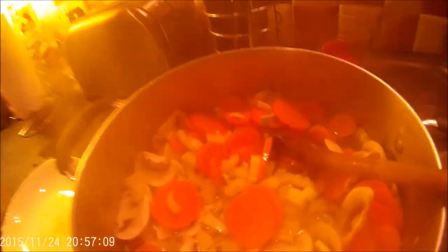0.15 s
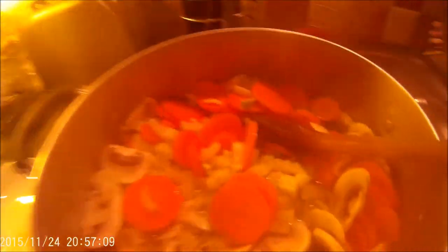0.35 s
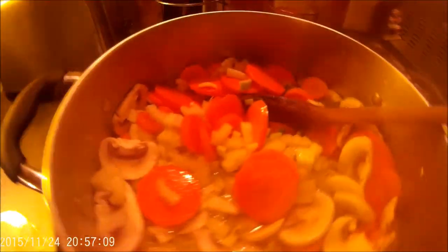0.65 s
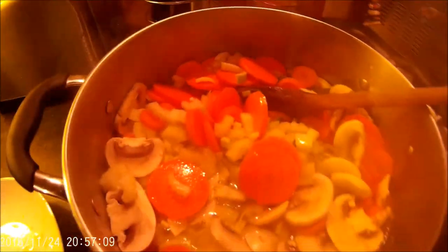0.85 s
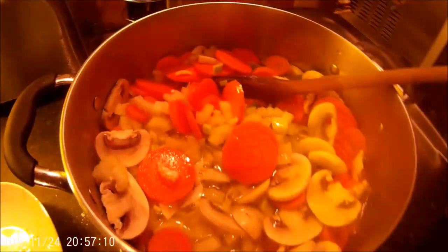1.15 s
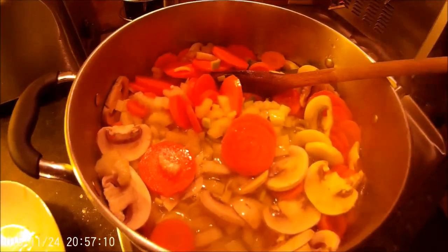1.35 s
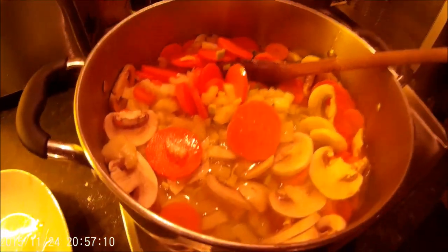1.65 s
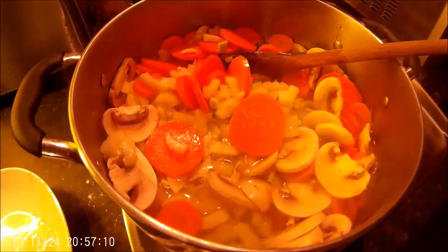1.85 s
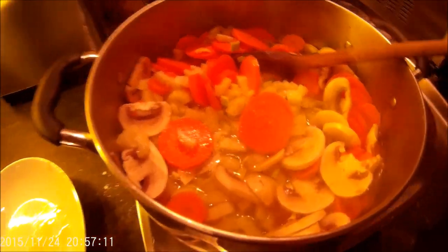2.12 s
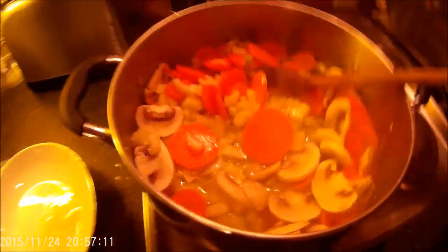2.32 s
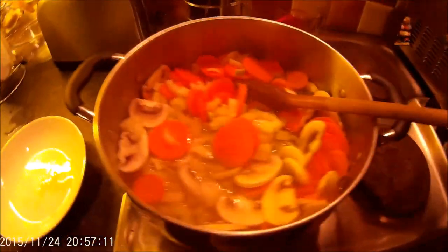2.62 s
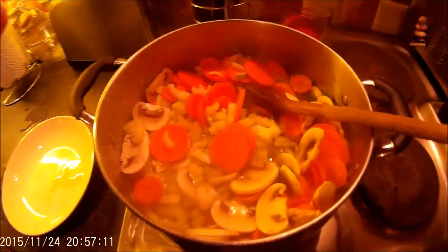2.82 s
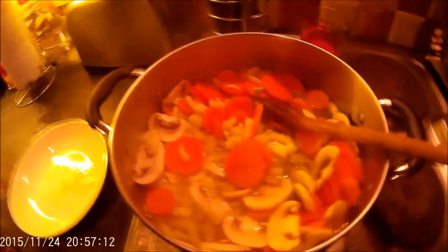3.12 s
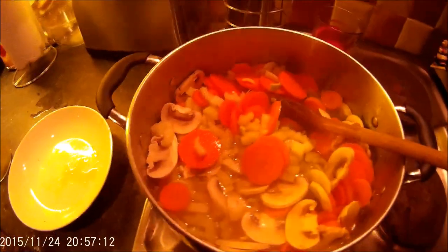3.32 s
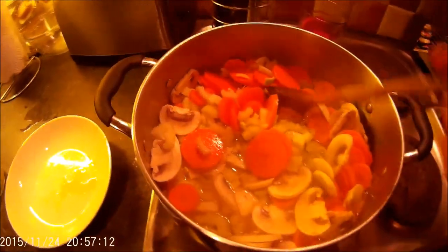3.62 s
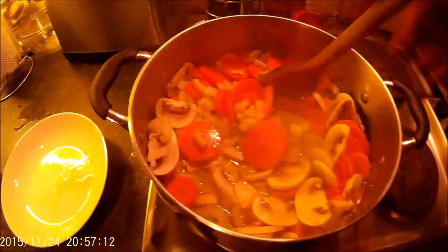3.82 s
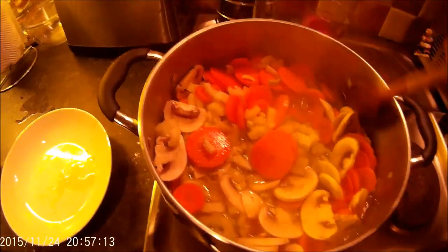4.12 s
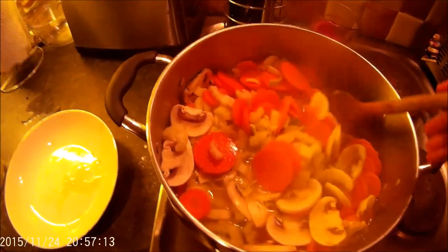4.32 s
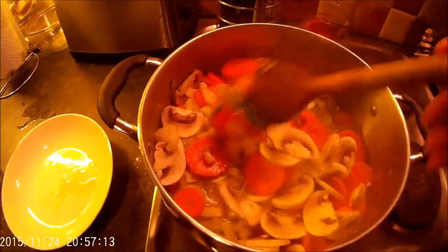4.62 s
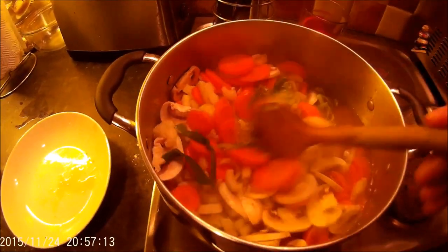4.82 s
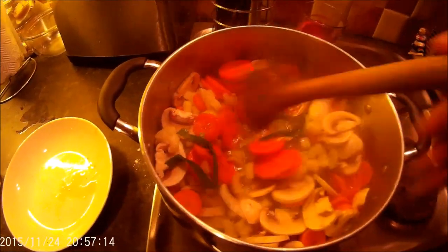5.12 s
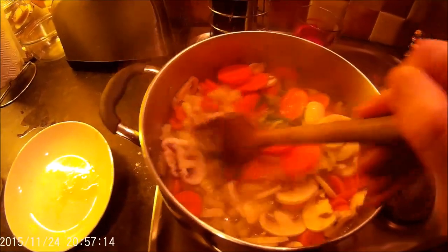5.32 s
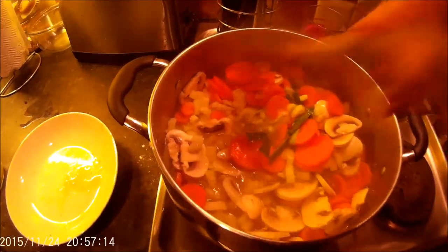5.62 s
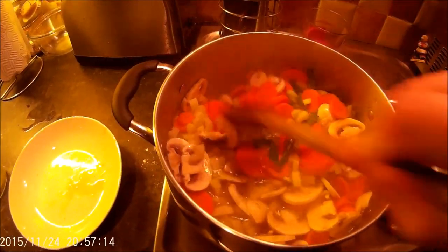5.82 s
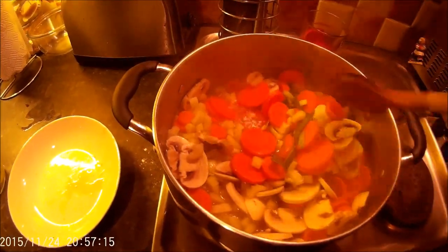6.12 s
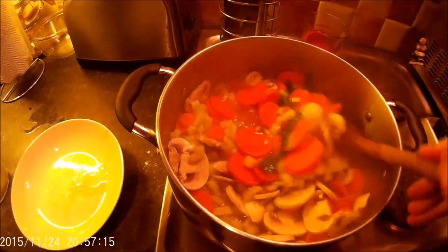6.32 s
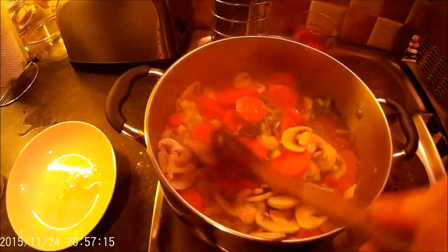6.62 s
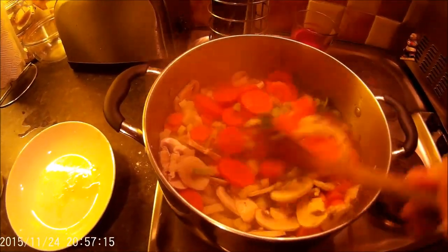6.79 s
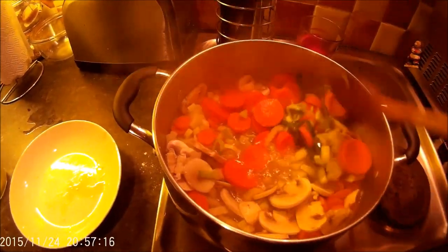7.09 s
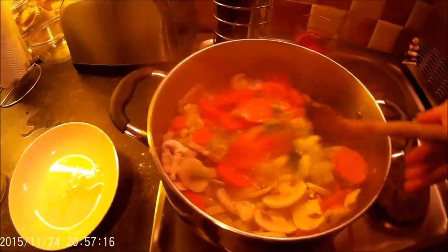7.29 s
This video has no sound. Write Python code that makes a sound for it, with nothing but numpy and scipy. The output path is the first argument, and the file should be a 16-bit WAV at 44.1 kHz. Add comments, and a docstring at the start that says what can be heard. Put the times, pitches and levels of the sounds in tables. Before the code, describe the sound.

A drawer thuds shut over a soft stove burner, then a wooden spoon knocks and stirs wet vegetables in a steel pot.

```python
"""A lit stove's burner rushes softly over a mains hum in a small tiled kitchen. Nearby a drawer rattles
along its runners and thuds shut, then a plastic camera case creaks and snaps in the hand.
From about four seconds a wooden spoon stirs vegetable stew in a steel pot. It knocks on the full,
well damped pot, which rings only briefly, and pushes softly through the vegetables while wet pockets
crackle and squelch between the pieces."""
import sys
import numpy as np
from scipy import signal
from scipy.fft import rfft, irfft, next_fast_len
from scipy.io import wavfile

SR = 44100
rng = np.random.default_rng(int(sys.argv[2]) if len(sys.argv) > 2 else 0)


def waveform_to_disk(signal):
    """Save audio, clipped to [-1, 1], as 16-bit WAV at the path in sys.argv[1]."""
    frames = np.transpose(np.atleast_2d(signal))
    scaled = np.clip(frames, -1, 1) * 32767
    samples = np.round(scaled).astype(np.int16)
    wavfile.write(sys.argv[1], SR, samples)


N = 328721
TIME = np.arange(N) / SR
AGE = TIME[:SR]   # the second that follows a hit

# Tone of the burner and room. Each row: frequency in Hz, relative noise density in dB.
BURNER_TONE = [(20, -7), (40, 0), (62, 5), (80, -6), (130, -4.5), (300, -4), (600, -6.5), (820, -14.5),
               (1100, -15), (1500, -23), (2200, -28), (4000, -37.5), (15000, -79)]
# Partials of the mains hum. Each row: frequency in Hz, level in dB.
HUM_PARTIALS = [(99.7, -63), (197.5, -72.5), (298, -70.5)]

# The drawer's bumps; the last is its stop. Each row: start in seconds, level in dB, boom level in dB.
DRAWER_BUMPS = [(1.235, -33.5, -39), (1.309, -40, -63), (1.342, -45, -48), (1.4303, -26, -24)]
# Tones of the runners and the wooden front. Each row: frequency in Hz, relative noise density in dB.
RUNNER_TONE = [(40, -31), (70, 11.5), (150, -10), (300, -7.5), (500, 5), (800, -12), (1250, -4.5),
               (2100, -17), (2650, -20), (3100, -34), (3800, -39), (5500, -69), (12000, -72)]
FRONT_TONE = [(80, -4), (170, -2), (300, 6.5), (480, 1.5), (760, -5), (920, -3.5), (1350, -6),
              (1800, -14.5), (2300, -21), (2680, -14.5), (3000, -25), (3800, -29), (5200, -46),
              (6300, -38.5), (7500, -48), (12000, -50)]
# Boom of cabinet and room. Each row: frequency in Hz, relative level in dB, t60 in seconds.
BOOM_MODES = [(65.5, -10, 0.67), (113.7, -1, 0.386), (216, -8, 0.28), (285, -6, 0.25), (357, -12, 0.19),
              (438, -12, 0.16), (614, -13, 0.28), (856, -10, .16), (939, -9, .16)]

# Creaks of the case. Each row: peak time in seconds, level in dB, starting pitch in Hz, rise and fall
# in seconds, seconds from the peak until it sticks again, relative rasp level in dB.
CASE_CREAKS = [(2.438, -57, 1559, 0.001, 0.013, .04, 1), (2.946, -54, 1600, 0.003, 0.02, .015, -3),
               (3.130, -35.5, 770, 0.006, 0.011, .018, -14)]
# Snaps as the grip lets go. Each row: start in seconds, level in dB, pitch in Hz.
CASE_SNAPS = [(2.9526, -32, 1670), (3.1272, -35, 1150)]

# Spoon hits on the pot. Each row: start in seconds, level in dB, hardness as a low-pass cutoff in Hz,
# depth from 0 (wall) to 1 (bottom), ring time multiplier, seconds until the blade lands (0 for never).
SPOON_KNOCKS = [(4.0281, -32, 6000, 0.071, 1, 0), (4.0365, -45, 2500, 0.22, .7, 0.0035),
                (4.0585, -42, 3500, 0.55, 1, 0.0029), (4.2787, -52, 1800, 0.8, .45, 0),
                (4.4160, -47.5, 1700, 0.75, .35, 0), (6.1814, -32, 5008, 0.58, .65, .003),
                (6.243, -49.5, 1190, 0.93, 1, 0.0006), (6.261, -48, 400, 1, .8, 0),
                (6.516, -58, 8000, .9, .4, 0), (6.5615, -58.5, 900, 1, .5, 0),
                (6.642, -62, 2000, 0.25, .5, 0), (6.789, -61, 4000, 1, .4, 0),
                (7.1215, -46.5, 1800, 0.15, .9, 0), (7.138, -50.5, 1100, .3, 1, 0)]
# Modes of the full pot. Each row: frequency in Hz, relative level in dB for a wall hit, the same for
# a hit near the bottom, t60 in seconds.
POT_MODES = [(298, -10, -6, 0.05), (352, -11, 2, 0.085), (482, -3, -8, 0.06), (560, -8, -7, 0.05),
             (645, -10, -8, .035), (785, -5, 5, 0.04), (925, -14, 5, 0.03), (1088, 5, -3, 0.042),
             (1218, 1, 5, 0.036), (1425, -3, -4, 0.022), (1565, -13, 3, 0.05), (1984, -26, -11, 0.035),
             (2290, -22, -10, 0.025), (3750, -14, -34, .02), (4130, -6, -50, 0.022)]
# Tone of the spoon's dry wooden clack. Each row: frequency in Hz, relative noise density in dB.
CLACK_TONE = [(80, 5), (170, -2.5), (330, 1), (450, 5.5), (750, 1.5), (1500, 3), (1750, -24), (2400, -23),
              (3000, -25.5), (4000, -30), (5200, -33), (7000, -40), (12000, -65)]
# Early reflections off tiles and cupboards. Each row: delay in seconds, gain in dB.
TILE_ECHOES = [(.0027, -14), (.0065, -10.5)]

# Pushes through the stew. Each row: fastest moment in seconds, length in seconds, drag level in dB,
# crackle level in dB.
SPOON_PUSHES = [(4.21, 0.62, -59.5, -71), (4.53, 0.31, -62, -70.5), (4.768, 0.67, -61.5, -71.5),
                (5.23, 0.18, -60, -72), (5.355, 0.17, -63, -62.5), (5.704, 0.14, -60.5, -67.5),
                (5.862, 0.099, -56, -69), (5.925, 0.19, -64, -68), (6.303, 0.32, -56.5, -67.5),
                (6.624, 0.2, -59, -78), (6.803, 0.096, -55.5, -66.5), (7.148, 0.12, -53.5, -62.5)]
# Tones of the stew's drag, crackle and spatter. Each row: frequency in Hz, relative noise density in dB.
DRAG_TONE = [(100, 1.5), (250, 10), (350, 8.5), (600, 6.5), (850, -6), (1250, -21), (1700, -29),
             (3000, -53), (8000, -43)]
CRACKLE_TONE = [(900, -9), (1400, -3), (1850, 0), (2100, -10), (2450, -4), (3000, -6), (4000, 2), (5000, 1)]
SPATTER_TONE = [(250, -16), (600, 6), (1100, 4), (1800, -12.5), (2500, 2), (3000, -25), (4500, -11),
                (8000, -34)]
# The standout squelches. Each row: start in seconds, level in dB, starting bubble pitch in Hz.
STEW_SQUELCHES = [(4.2428, -66, 1540), (4.3875, -61.5, 2360), (4.4528, -66, 2200), (4.5561, -66, 2520),
                  (4.7137, -73, 2000), (4.8374, -63, 1810), (4.937, -58, 468), (5.2495, -63.5, 1650),
                  (5.2969, -61, 1760), (5.3315, -56.5, 1810), (5.3563, -60, 1870), (5.668, -65, 1760),
                  (5.7264, -64, 1780), (5.8556, -63, 1860), (5.868, -57.5, 1500), (5.8965, -60.5, 1950),
                  (6.2425, -56, 2250), (6.8184, -63.5, 1870), (6.823, -53, 623)]

# Decay of the kitchen reverb. Each row: frequency in Hz, t60 in seconds.
REVERB_T60 = [(150, 0.63), (400, 0.39), (1000, 0.49), (2000, 0.27), (4000, 0.33)]
# Colour of the reverb under the hood. Each row: frequency in Hz, relative gain in dB.
HOOD_TONE = [(200, -1.5), (340, 3.5), (430, -3.5), (650, 1), (830, -1), (1100, -5), (1400, -5.5),
             (2200, 1.5), (4000, 0)]


def from_db(db):
    """Decibels to gain."""
    return 10 ** (np.asarray(db) / 20)


def unit_rms(x, size=None):
    """Scale to rms 1, judged on the first samples if a size is given."""
    return x / np.sqrt(np.mean(x[:size] ** 2) + 1e-20)


def at_hz(points, hz):
    """Read a table on a log-frequency axis."""
    freqs, values = np.transpose(points)
    return np.interp(np.log(np.maximum(hz, 1)), np.log(freqs), values)


def colour(x, tone):
    """EQ a sound with a tone table; rms 1."""
    size = next_fast_len(len(x))
    gains = from_db(at_hz(tone, np.fft.rfftfreq(size, 1 / SR)))
    return unit_rms(irfft(rfft(x, size) * gains, size)[:len(x)])


def butter(x, hz, kind, order=2):
    """A causal low-, high- or band-pass."""
    return signal.sosfilt(signal.butter(order, np.clip(hz, 10, .45 * SR), kind, fs=SR, output="sos"), x)


def resonate(x, hz, width_hz):
    """One resonance with gain 1 at its peak."""
    r = np.exp(-np.pi * width_hz / SR)
    feedback = [1, -2 * r * np.cos(2 * np.pi * hz / SR), r * r]
    return signal.lfilter(np.array([1, 0, -1]) * (1 - r * r) / 2, feedback, x + 1e-18)


def drift(points_per_s):
    """A random wander of rms 1."""
    points = rng.standard_normal(4096)
    return unit_rms(np.interp(TIME * points_per_s, np.arange(len(points)), points))


def decay(t60):
    """An envelope that falls 60 dB in t60 seconds."""
    return np.exp(-np.log(1000) * AGE / t60)


def mode(hz, t60):
    """A struck mode: a decaying sine."""
    return np.sin(2 * np.pi * hz * AGE) * decay(t60)


def add(out, start_s, sound):
    """Mix a sound in at its cue."""
    start = int(round(start_s * SR))
    part = sound[:max(len(out) - start, 0)]
    out[start:start + len(part)] += part


def burner_and_hum(rush_db=-60, rumble_db=-68, waver_db=1.5):
    """The bed: the burner's soft rush, a rumble in the room's lowest mode and a wavering mains hum."""
    out = from_db(rush_db) * colour(rng.standard_normal(N), BURNER_TONE)
    out += from_db(rumble_db) * unit_rms(resonate(rng.standard_normal(N), BOOM_MODES[0][0], width_hz=7))
    for hz, db in HUM_PARTIALS:
        out += from_db(db + waver_db * drift(5)) * np.sin(2 * np.pi * hz * TIME)
    return out


def drawer_runners(level_db=-40, attack_s=.004, release_t60=.66, rattle_db=2):
    """The runners rattle from the first bump to the stop, then die away."""
    start_s, stop_s = DRAWER_BUMPS[0][0], DRAWER_BUMPS[-1][0]
    attack = np.clip((TIME - start_s) / attack_s, 0, 1)
    release = np.exp(-np.log(1000) * np.maximum(TIME - stop_s, 0) / release_t60)
    roll = colour(rng.standard_normal(N), RUNNER_TONE)
    return roll * attack * release * from_db(level_db + rattle_db * drift(160))


def drawer_bounces(first_gap_s=.0555, gap_shrink=.87, losses_db=(12, 14.5)):
    """The drawer bounces off its stop, sooner and weaker each time; gives further rows of bumps."""
    stop_s, db, boom_db = DRAWER_BUMPS[-1]
    starts = stop_s + np.cumsum(first_gap_s * gap_shrink ** np.arange(len(losses_db)))
    return [(start_s, db - loss, boom_db - loss) for start_s, loss in zip(starts, losses_db)]


def wood_burst(tone, envelope, top_hz):
    """Struck wood: shaped noise stands for its crowd of fast-dying modes; rms 1 over the attack."""
    burst = colour(rng.standard_normal(SR), tone) * envelope
    return unit_rms(butter(burst, top_hz, "low", order=4), size=900)


def drawer(contact_s=.00041, crack_t60=.09, tail_db=-14, tail_t60=.64):
    """The drawer rolls and slams; each bump is a wooden crack over the boom of cabinet and room."""
    out = drawer_runners()
    boom = sum((-1) ** k * from_db(db) * mode(hz, t60) for k, (hz, db, t60) in enumerate(BOOM_MODES))
    envelope = (1 - np.exp(-AGE / contact_s)) * (decay(crack_t60) + from_db(tail_db) * decay(tail_t60))
    for start_s, db, boom_db in list(DRAWER_BUMPS) + drawer_bounces():
        crack = wood_burst(FRONT_TONE, envelope, top_hz=7140)
        add(out, start_s, from_db(db) * crack + from_db(boom_db) * boom)
    return butter(out, 39, "high")


def case_creaks(climb_hz=504, climb_s=.0085, jitter=.11, tilt_db_per_octave=-13, uneven_db=3.5,
                rub_db=-18, rub_s=.031, stick_s=.0007):
    """Plastic slips unevenly under the fingers, climbs in pitch as the grip lets go, and sticks again."""
    out = np.zeros(N)
    t = AGE[:SR // 5] - .1   # seconds from the creak's peak
    climb = climb_hz * (1 - np.exp(-(np.maximum(t, 0) / climb_s) ** 2))
    for peak_s, db, hz, rise_s, fall_s, stop_s, rasp_db in CASE_CREAKS:
        cycles = np.cumsum((hz + climb) * (1 + jitter * drift(1100)[:len(t)])) / SR
        slips = sum(from_db(tilt_db_per_octave * np.log2(k)) * np.sin(2 * np.pi * k * cycles)
                    for k in range(1, 6))
        friction = 1 - cycles % 1   # strongest just after each slip
        rasp = butter(friction * rng.standard_normal(len(t)), [700, 2600], "band")
        creak = unit_rms(slips) + from_db(rasp_db) * unit_rms(rasp)
        peak = np.exp(-np.maximum(-t / rise_s, t / fall_s))
        rub = from_db(rub_db) * np.exp(-np.abs(t) / rub_s)
        sliding = np.exp(-np.maximum(t - stop_s, 0) / stick_s)
        gain = from_db(db + uneven_db * drift(398.46)[:len(t)])
        add(out, peak_s + t[0], gain * creak * (peak + rub) * sliding)
    return butter(out, [560, 4200], "band", order=3)


def case_snaps(swell_cycles=1.4, tick_db=-5):
    """The grip lets go with a tick, and the hand-damped shell rings for a few cycles."""
    out = np.zeros(N)
    tick = from_db(tick_db) * mode(hz=4600, t60=.0021)
    for start_s, db, hz in CASE_SNAPS:
        swell = hz * AGE / swell_cycles
        shell = np.sin(2 * np.pi * hz * AGE) * swell * np.exp(1 - swell)
        add(out, start_s, from_db(db) * (shell + tick))
    return out


def pot_hit(hardness_hz, depth, ring, vary_db=4.5, clack_db=-3.5, clack_t60=.04, steel_db=-27):
    """Wood clacks on steel, the stew chokes the ring, and near walls answer within milliseconds."""
    pot = 0
    for k, (hz, wall_db, bottom_db, t60) in enumerate(POT_MODES):
        # where the spoon lands decides how strongly each mode speaks
        mode_db = wall_db + np.clip(depth, 0, 1) * (bottom_db - wall_db) + vary_db * rng.standard_normal()
        # bare steel above the stew rings on faintly, mostly below 1500 Hz
        steel = from_db(steel_db) * ring ** 2 / (1 + (hz / 1500) ** 6) * mode(hz, t60=.073)
        pot += (-1) ** k * from_db(mode_db) * (mode(hz, t60 * ring) + steel)
    clack = wood_burst(CLACK_TONE, decay(clack_t60 * ring), top_hz=5040)
    direct = butter(unit_rms(pot, size=900) + from_db(clack_db) * clack, hardness_hz, "low", order=1)
    heard = direct.copy()
    for delay_s, echo_db in TILE_ECHOES:
        add(heard, delay_s, from_db(echo_db) * direct)
    return unit_rms(heard, size=900)


def spoon_knocks(blade_db=2, blade_dulling=.45, blade_deeper=.14, rest_s=.0068, rest_db=-7, rest_hz=680,
                 thud_db=-21, thud_hz=170, thud_t60=.22):
    """The spoon hits the pot squarely or tip first; deeper hits also rock the pot on its grate."""
    hits, thuds = np.zeros(N), np.zeros(N)
    for start_s, db, hardness_hz, depth, ring, blade_s in SPOON_KNOCKS:
        add(hits, start_s, from_db(db) * pot_hit(hardness_hz, depth, ring))
        if blade_s > 0:   # the blade follows the tip, louder and duller, then rests on the bottom
            blade = pot_hit(hardness_hz * blade_dulling, depth + blade_deeper, ring)
            add(hits, start_s + blade_s, from_db(db + blade_db) * blade)
            touch = pot_hit(rest_hz, depth=1, ring=ring)
            add(hits, start_s + blade_s + rest_s, from_db(db + rest_db) * touch)
        rocking = resonate(rng.standard_normal(SR), thud_hz, width_hz=180)
        thud = unit_rms(butter(rocking, 2 * thud_hz, "low")) * decay(thud_t60)
        add(thuds, start_s, from_db(db + thud_db) * depth * thud)
    return butter(hits, 164, "high") + thuds   # the knocks keep nothing below about 160 Hz; only the rocking thud reaches low


def push_envelopes(glide_drag_db=-75.5, glide_crackle_db=-80.5, swell_share=.31, settle_share=.32):
    """Gains of drag and crackle: each push swells and settles on top of the spoon's quiet glide."""
    in_stew = TIME > SPOON_KNOCKS[0][0]   # the first knock puts the spoon in
    drag_power = from_db(glide_drag_db) ** 2 * in_stew
    crackle_power = from_db(glide_crackle_db) ** 2 * in_stew
    for peak_s, length_s, drag_db, crackle_db in SPOON_PUSHES:
        progress = (AGE - .5) / length_s   # zero at the fastest moment
        push = np.exp(-np.where(progress < 0, (progress / swell_share) ** 2, progress / settle_share))
        add(drag_power, peak_s - .5, (from_db(drag_db) * push) ** 2)
        add(crackle_power, peak_s - .5, (from_db(crackle_db) * push) ** 2)
    return np.sqrt(drag_power), np.sqrt(crackle_power)


def wet_crackle(pops_per_s=1400, size_db=3, clump_db=3, pop_q=5.5, top_hz=2700):
    """Tiny wet pockets pop between the pieces, their loudness coming in clumps; rms 1."""
    sizes = from_db(size_db * np.minimum(rng.exponential(1, N), 3) + clump_db * drift(54))
    polarity = rng.choice([-1, 1], N)
    pops = (rng.random(N) < pops_per_s / SR) * sizes * polarity
    pitches = np.geomspace(900, 4800, 18)
    pitch_index = rng.integers(0, len(pitches), N)
    crackle = np.zeros(N)
    for k, hz in enumerate(pitches):
        ringing = resonate(pops * (pitch_index == k), hz, hz / pop_q)
        crackle += from_db(at_hz(CRACKLE_TONE, hz)) * ringing / np.sqrt(hz)
    return unit_rms(butter(crackle, top_hz, "low", order=3))


def stirring(lumpy_db=2):
    """The spoon pushes through the vegetables: a low, lumpy drag with wet crackle on top."""
    drag_gain, crackle_gain = push_envelopes()
    drag = colour(rng.standard_normal(N), DRAG_TONE) * from_db(lumpy_db * drift(90))
    return drag * drag_gain + wet_crackle() * crackle_gain


def squelches(attack_s=.00024, bubble_t60=.027, rise_per_s=4, spatter_db=1.5, spatter_t60=.015):
    """A wet pocket tears open with a spatter; its bubble rises in pitch as it nears the surface."""
    out = np.zeros(N)
    opening = 1 - np.exp(-AGE / attack_s)
    for start_s, db, hz in STEW_SQUELCHES:
        bubble = mode(hz * (1 + rise_per_s * AGE / 2), bubble_t60)
        spatter = butter(colour(rng.standard_normal(SR), SPATTER_TONE), 2 * hz, "low")
        squelch = opening * (bubble + from_db(spatter_db) * spatter * decay(spatter_t60))
        add(out, start_s, from_db(db) * unit_rms(squelch, size=450))
    return butter(out, 4500, "low", order=3)


def kitchen_reverb(send, build_s=.00044):
    """The tiled room's diffuse tail, coloured by the hood; each octave dies at its own rate."""
    tail = np.zeros(SR)
    for hz in 125 * 2. ** np.arange(7):
        band = butter(rng.standard_normal(SR), [hz / np.sqrt(2), hz * np.sqrt(2)], "band")
        tail += band * decay(at_hz(REVERB_T60, hz))
    tail = colour(tail, HOOD_TONE) * (1 - np.exp(-AGE / build_s))
    return signal.fftconvolve(send, tail / np.sqrt(np.sum(tail ** 2)))[:N]


def scene(reverb_send_db=-8):
    """The mono mix: pot and stew feed the reverb, the drawer has its own tail, the close case is dry."""
    cooking = spoon_knocks() + stirring() + squelches()
    room = kitchen_reverb(from_db(reverb_send_db) * cooking)
    return (cooking + room + drawer() + case_creaks() + case_snaps() + burner_and_hum())[None]


def record(dry, dip_db=-6, dip_hz=2860, hiss_db=-68.5, cutoff_hz=15400):
    """A small microphone's one weak band and even hiss, then a steep cut at the top."""
    sound = dry - (1 - from_db(dip_db)) * resonate(dry, dip_hz, width_hz=1170)
    sound += from_db(hiss_db) * rng.standard_normal(N)
    return signal.sosfilt(signal.ellip(10, .1, 70, cutoff_hz, fs=SR, output="sos"), sound)


dry = scene()
out = record(dry)
waveform_to_disk(out)
```